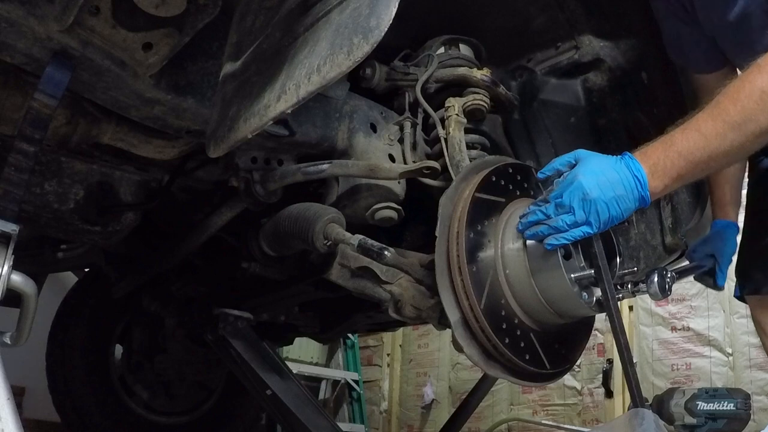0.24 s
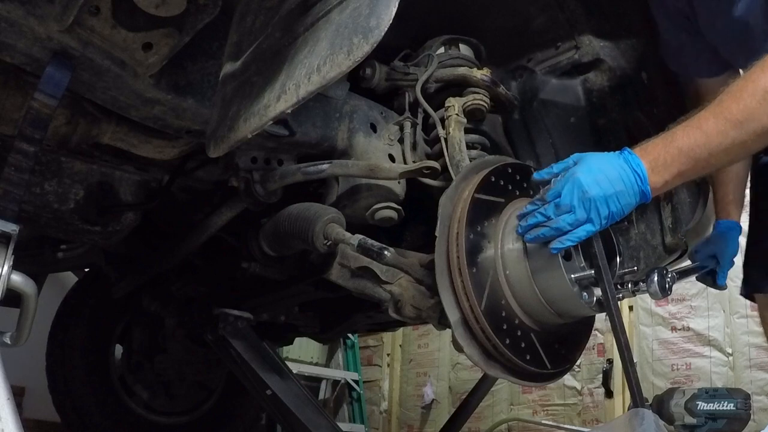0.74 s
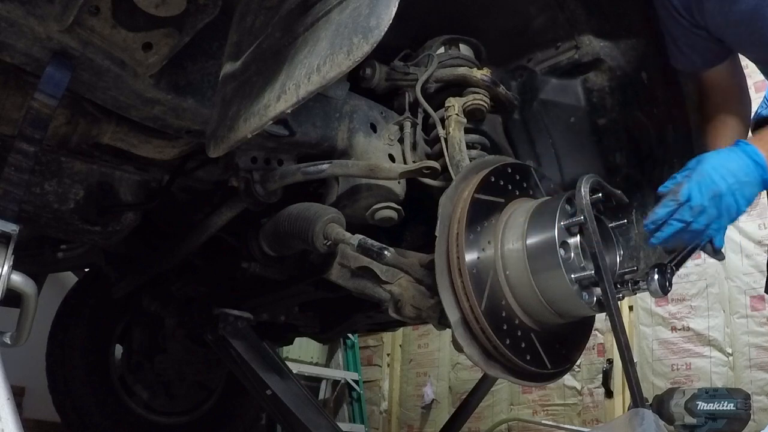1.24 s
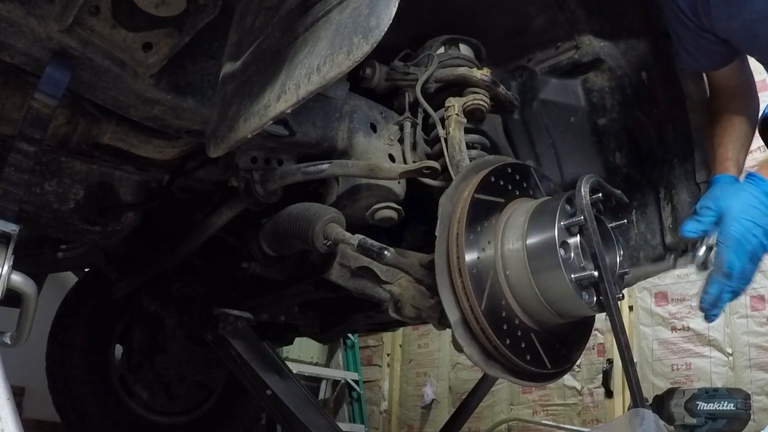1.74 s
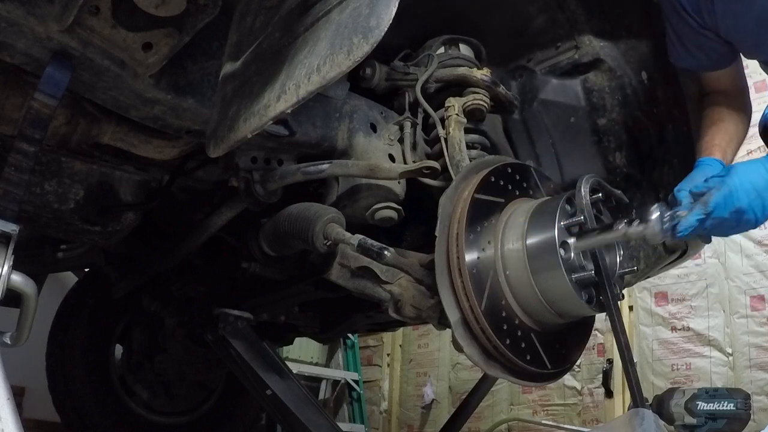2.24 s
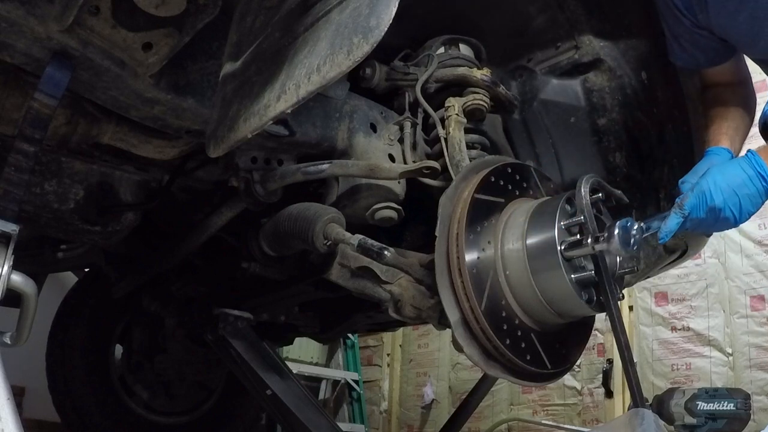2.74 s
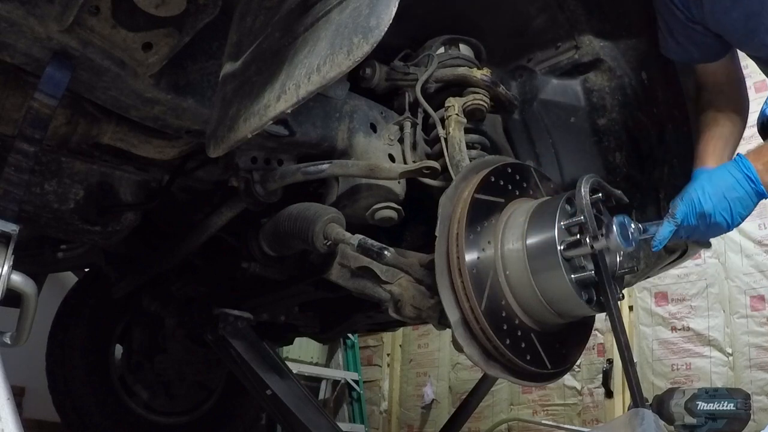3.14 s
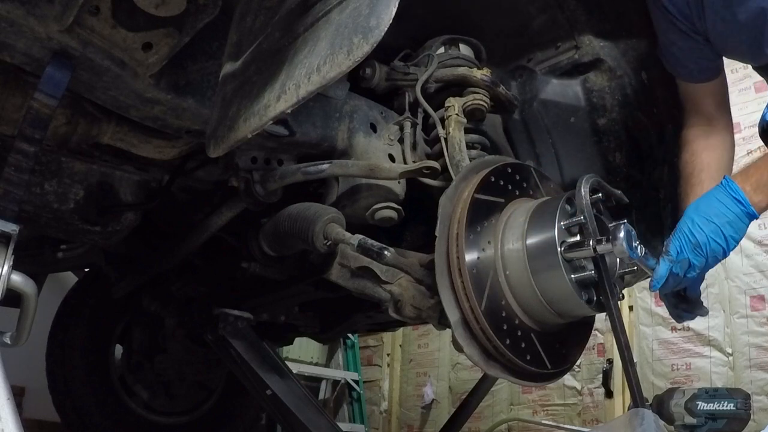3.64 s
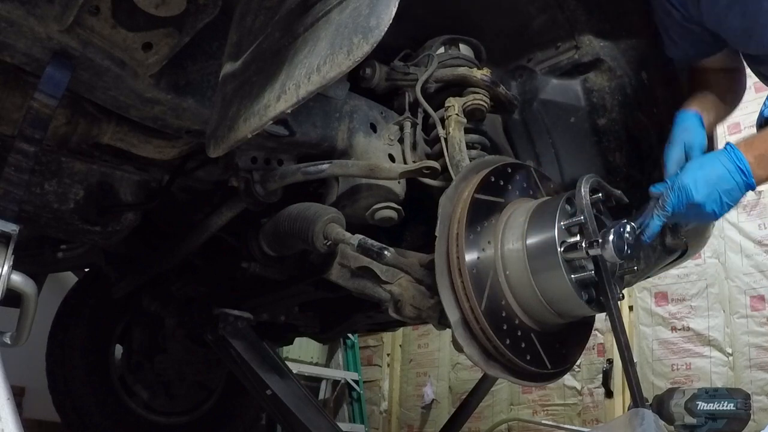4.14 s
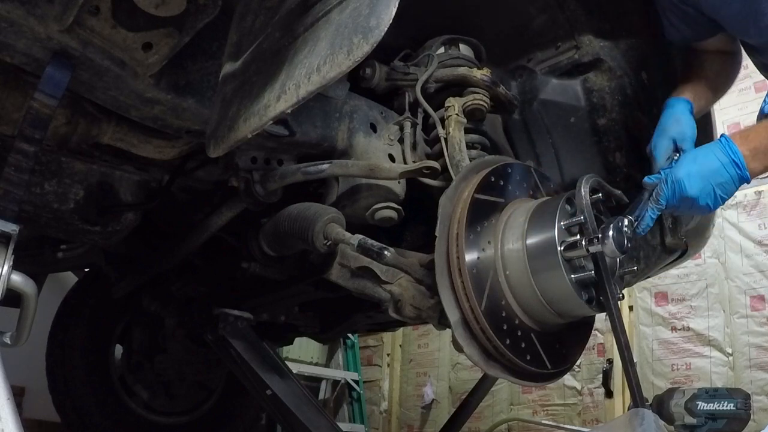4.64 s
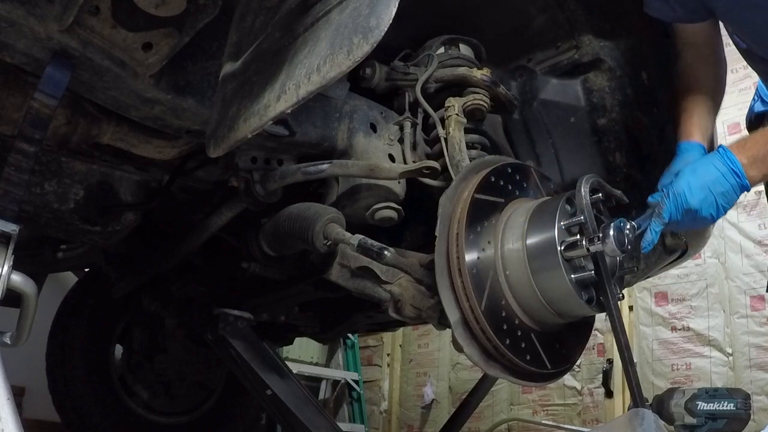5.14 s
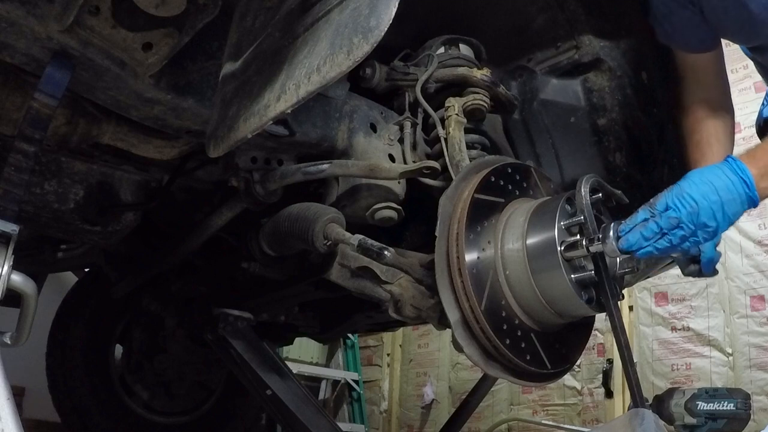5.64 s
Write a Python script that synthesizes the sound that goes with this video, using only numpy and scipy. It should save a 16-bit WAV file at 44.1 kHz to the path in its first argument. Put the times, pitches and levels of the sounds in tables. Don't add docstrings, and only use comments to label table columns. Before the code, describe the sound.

A torque wrench gives two loud metallic clacks on a wheel nut, then its socket clinks softly onto other nuts in a garage.

```python
import sys
import numpy as np
from scipy import signal
from scipy.fft import rfft, irfft
from scipy.io import wavfile
from scipy.ndimage import uniform_filter1d

SR = 44100
rng = np.random.default_rng(int(sys.argv[2]) if len(sys.argv) > 2 else 0)


def makeup_ratio(level_db):
    decades = np.asarray(level_db, float) / 20
    return 10 ** decades


def master(y):
    cut = np.clip(np.atleast_2d(y).T, -1, 1)
    pcm = np.round(cut * 32767)
    wavfile.write(sys.argv[1], SR, pcm.astype(np.int16))


N = 259749

# frequency_hz, density_db_per_hz
AIR_SPECTRUM = [(14, -38), (24, -16), (102, -7.5), (124, -14), (181, 1.5), (258, -7.5), (288, -4),
                (368, -11), (602, -15), (882, -18.5), (957, -17), (1040, -19), (5960, -30), (15300, -48.5),
                (16400, -50)]
# frequency_hz, width_hz, rms_db
DUCT_RESONANCES = [(58.4, 8.7, -70.5), (103, 8.76, -65), (190, 22, -62), (203.1, 39, -68.5), (239, 10, -64),
                   (287, 7.55, -62.5), (341.6, 24.8, -78), (437, 38, -65), (591.3, 49, -64.5),
                   (695.7, 19.87, -72.5), (974, 14, -66), (1160, 9.2, -69.5), (1318, 3.8, -73),
                   (1629, 47.9, -77), (2830, 6.5, -77)]
# frequency_hz, rms_db
MOTOR_TONES = [(25.6, -64.5), (59.2, -66)]
# peak_time_s, peak_db
GUSTS = [
    (0.11, -66),
    (0.39, -56),
    (0.66, -46),
    (.92, -48),
    (1.18, -46),
    (1.78, -47),
    (4.81, -58),
    (5.4, -61),
    (5.8, -47),
]

# start_s, ring_db, crack_db, chassis_thump_db, chatter_length_s
BREAKS = [
    (0.4, -6.5, -0.5, -20.5, 0.00833),
    (0.7664, 0, -3, -19.5, 0.0084),
]
# start_s, peak_db
CAM_BLOWS = [
    [(.4004, -2), (.4013, -5.5), (.4023, -3.5), (.4048, -0.5), (.4063, -1.5), (.4076, -4), (.4098, -5), (.4127, -12)],
    [(.7669, -1), (.7678, -5), (.7688, 1), (.7701, -3.5), (.7729, -8), (.7773, -6.5), (.7797, -9.5), (.7818, -8.5)],
]
# frequency_hz, level_db, t60_s
BREAK_MODES = [(1820, -18, 0.1202), (2298, -20.5, .15), (2766, -23.5, .15), (3673, -15, .18),
               (4027, -10, 0.071), (4280, -15, .17), (4520, -14, .13), (4650, -14.5, .09),
               (6000, -14.5, .05), (6283, -22, .1), (7585, -17, 0.087), (8775, -18.5, .1),
               (10600, -23, 0.18), (10990, -19, .09)]
RESET_MODES = [(1953, -15, 0.044), (2740, -16, .1), (3000, -24, .1), (3540, -13, .12), (3930, -19.5, .1),
               (4300, -17, .08), (4600, -17, .07), (5080, -19, 0.068), (5700, -24.5, .16),
               (6450, -13.5, 0.074), (8700, -5, 0.058), (10200, -13, .05)]
# frequency_hz, level_db, t60_s
BREAK_CLEAR_MODES = [(1843, -30, .22), (2062, -23.5, .24), (2143, -27, .44), (2540, -30, .15),
                     (2600, -23, .17), (2998, -30, .15), (3097, -27, .3), (4170, -51, .75),
                     (4370, -21, .19), (4520, -22, .14), (5230, -53, 1.1), (9862, -11.5, .18)]
RESET_CLEAR_MODES = [(1900, -17, .06), (2089, -39, .5), (2600, -27, .16), (2797, -29, .2), (3097, -28, .28),
                     (3274, -19, .16), (3407, -23, .12), (3488, -22, .15), (3596, -26, .27),
                     (3726, -22, .12), (3840, -23, .12), (5211, -29.5, .3), (6300, -20, .06),
                     (6620, -21, .1), (9819, -28, .24)]
# frequency_hz, density_db_per_hz
BREAK_CRACK = [(410, -43.5), (700, -25), (1700, -17.5), (2080, -2), (3300, -11), (4400, 0), (5000, -12.5),
               (6000, -2), (7000, -12), (7700, -5.5), (9300, -13.5), (10500, -4), (11500, -18.5),
               (14800, -16), (16000, -37.5)]
RESET_CRACK = [(410, -37), (700, -22.5), (852, -18.5), (1050, -24), (1890, -15.5), (2220, -13.5),
               (3370, -5.5), (4050, -7), (5120, -8), (7010, -12.5), (9990, -6.5), (11100, -18.5),
               (14200, -18), (15400, -24), (16000, -47.5)]
# frequency_hz, level_db, t60_s
BREAK_CHASSIS = [(38.7, -22.5, 0.41), (52, -20.5, 0.608), (199, -2, 0.11), (226, -0.5, .08),
                 (264, -11.5, .22), (317.7, -8.5, 0.19), (374, -7.5, .1), (410, -14, .13),
                 (457, -18.5, .15), (545.6, -19.5, .15), (630, -19, 0.17), (755, -23, .2),
                 (894, -17.5, 0.11)]
RESET_CHASSIS = [(38.24, -19, 0.84), (51.6, -23.5, 1), (176, -14.5, 0.15), (205, 4, 0.085), (252, -4, 0.12),
                 (255, -6, 0.23), (297, -15, 0.29), (372.5, 1, 0.17), (416, -14, 0.21), (483, -19, 0.27),
                 (563.5, -12.5, 0.13), (822, -17.5, 0.031)]

# frequency_hz, t60_s
ARCH_T60 = [(100, 0.51), (260, 0.28), (700, 0.39), (1840, 0.19), (4850, 0.15), (12800, 0.1109)]

# start_s, ring_db, crack_db, crack_length_s, brightness_db_per_octave
SEAT = [
    (1.249, -58.5, -50, 0.013, .1),
    (2.491, -60, -28, .0016, .1),
    (2.4925, -30, -32, .009, .1),
    (5.845, -57, -43, .01, .1),
]
LIFT_OFF = [
    (1.598, -56.5, -46.5, 0.0048, -15.5),
    (1.6262, -28, -25, .0078, 1.3),
]
REBOUND = [
    (2.613, -46, -46, .006, .1),
    (2.8955, -42.5, -41, 0.0087, .1),
]
TURN = [
    (2.8405, -33, -29.5, 0.0071, 0.55),
    (2.855, -50, -29, 0.0073, .1),
    (2.871, -56, -32.5, 0.0063, .1),
]
SHIFT = [
    (3.2025, -65, -51, .006, .1),
    (3.2522, -29, -29, 0.0061, 2.3),
    (3.269, -48, -36, 0.004, -5),
]
SETTLE = [
    (3.318, -41.5, -36, 0.0041, 1.5),
    (3.323, -48, -38.5, .004, -0.5),
    (3.334, -61, -41, .0079, -6),
]
RATTLE = [
    (4.183, -52, -52, 0.0053, -1),
    (4.1905, -51, -46, .004, -1),
    (4.198, -49, -54, .005, -3),
    (4.209, -48, -46, 0.004, 5),
    (4.217, -52, -52, .005, -4),
]
LATCH = [
    (4.227, -46.5, -39.5, .003, .1),
    (4.237, -56, -38, 0.0038, -1),
]
TICKS = [
    (2.9045, -47, -41, .0015, -2),
    (4.1905, -58, -46, .0012, 5),
    (4.2283, -49, -39, .0015, 1),
    (4.3763, -50, -50, .001, 3),
    (4.3843, -30, -40, .001, 3),
]
# frequency_hz, level_db, t60_s
SEAT_MODES = [(785, -25, .04), (946, -12, .051), (1100, -10, 0.051), (1233, -20, 0.11), (1495, -19, 0.11),
              (1690, -18, .25), (1848, 7.5, 0.051), (1927, 1, 0.04), (2260, -11, 0.11), (2471, -16, 0.19),
              (2540, -14, 0.19), (2820, -21, 0.19), (3451, -21, 0.13), (3600, -15, 0.1), (4640, -21, 0.11),
              (5070, -16, 0.04)]
LIFT_OFF_MODES = [(1147, -32, 0.33), (1800, -11.5, 0.16), (1856, -16, .1), (2063, -12, 0.15),
                  (2141, -15, .2), (2190, -15, 0.15), (2247, -14, .13), (2369, -24, .2), (2600, -26, 0.2),
                  (3505, -13, 0.13), (3619, -4.5, 0.14), (3713, -4.5, .18), (4430, -20, 0.15),
                  (4600, -17, .09), (6400, -24, 0.09), (10430, -14, .05), (10492, -27, 0.55),
                  (10575, -5, .055), (10492, -1, 0.065)]
REBOUND_MODES = [(1880, 2, 0.05), (2255, -8.5, .14), (2600, -13, 0.12), (3095, -12, 0.07),
                 (3400, -9, 0.042), (3714, -2, 0.11), (4460, -17, .08), (5857, -19, 0.08),
                 (10660, -16, 0.06)]
TURN_MODES = [(1850, -8, 0.16), (2040, -12, .06), (2234, -7, 0.11), (2606, -17, 0.2), (3106, -17, 0.2),
              (3714, -13, .11), (4000, 1, 0.05), (4280, -20, .13), (4590, -16, .1), (5100, -18, .12),
              (5857, -12, .1), (6230, -17, 0.064), (6648, -15, .1), (7300, -20, 0.14), (10610, -4, 0.11),
              (10950, -10, .02)]
SHIFT_MODES = [(1136, -20, 0.12), (1868, -10, 0.1), (2239, -21, 0.22), (3106, -23, .15), (3420, -16, .07),
               (3620, -0.5, 0.068), (3690, -6, 0.07), (4120, -21, .07), (4310, -23, .12),
               (4620, -17, 0.099), (5070, -20, 0.09), (7360, -28, 0.12), (8900, -19, 0.021),
               (11000, -17, 0.022), (11500, -21, 0.029), (12000, -25, .027)]
SETTLE_MODES = [(1434, -11, 0.25), (1650, -17, .15), (1845, 6.5, 0.062), (2250, -15, .1), (2610, -14, .11),
                (2950, -16, .08), (3650, -6, 0.11), (3700, -7, 0.17), (4270, -20, .06), (4670, -12, .054),
                (5200, -17, .1), (8120, -9, .02), (9000, -12, .015), (11200, -3.5, 0.016),
                (11400, -18, .035)]
RATTLE_MODES = [(1820, -1, 0.12), (3330, -6, .05), (3550, -3, .06), (3750, 0, .06), (3950, -3, .05),
                (4290, -6, .05), (5950, -14, .04), (8950, -16, .02), (10870, -9, 0.03), (11300, -12, .02)]
LATCH_MODES = [(1830, -3, .1), (2270, -2, 0.063), (2600, -10, .12), (3060, -10, .1), (3920, -4, .06),
               (4120, -6, .06), (5200, 0, .05), (6400, -12, .04), (11000, -10, .03)]
TICK_MODES = [(5400, -2, .011), (7000, -4, .01), (8600, 0, .012), (11900, -8, .01), (14000, -10, .01)]
# frequency_hz, density_db_per_hz
SEAT_CRACK = [(600, -16), (900, -5), (1400, -2.5), (1850, -2.5), (2600, -9.5), (5000, -19), (9000, -22.5),
              (14000, -36), (16000, -41.5)]
LIFT_OFF_CRACK = [(600, -12.5), (1500, -9.5), (2100, 4), (2800, -8.5), (3700, 1), (5500, -9.5), (8000, -20),
                  (10500, -4), (12500, -25), (16000, -35)]
TURN_CRACK = [(350, -41), (600, -15), (1550, -12), (2210, 1), (2760, -11), (3940, -8.5), (7730, -17),
              (10700, -19), (16000, -45)]
SHIFT_CRACK = [(600, -24), (1850, -10.5), (2700, -11), (3500, 3.5), (4600, -8.5), (6000, -20), (11500, -19),
               (16000, -42)]
SETTLE_CRACK = [(350, -31), (600, -10), (1130, -14), (1880, -7), (3340, -14), (3680, -8), (5560, -21),
                (11300, -34), (16000, -35)]
RATTLE_CRACK = [(600, -21), (1850, -6), (2900, -6), (3600, -13), (4500, -8), (6500, -14), (8500, -16),
                (16000, -31)]
RING_SWELLS = (0.0013, 0.0022, 0.0022, 0.0019, 0.00086, 0.0014, 0.0011, .001, 0.00045)

# start_s, length_s, level_db
SLIDES = [
    (1.579, .069, -53.5),
    (4.176, 0.07, -49.5),
]
# peak_time_s, peak_db
RUSTLES = [
    (1.93, -63.5),
    (4.57, -64.5),
    (4.64, -64),
    (5.68, -64),
]
# start_s, peak_db, length_s
SNAPS = [
    (4.3765, -41, 0.006),
    (4.381, -35, .004),
    (4.3843, -22, 0.0016),
    (4.3863, -29, 0.0022),
    (4.3897, -24.5, 0.004),
    (4.396, -33, .004),
]
# frequency_hz, density_db_per_hz
SNAP_SPECTRUM = [(350, -28), (600, -20), (1110, -19), (1370, -1.5), (1550, -19), (1800, 2), (2040, -7),
                 (2650, -10.5), (2950, 1), (3210, -9), (3860, -6.5), (5400, -8.5), (7520, -13),
                 (8500, -10.5), (10100, -5), (12000, -21), (15200, -16), (16000, -36.5)]


def rms_one(x):
    return x / np.sqrt(np.mean(x ** 2) + 1e-20)


def peak_one(x):
    return x / (np.max(np.abs(x)) + 1e-12)


def at_hz(points, hz):
    table = np.array(points)
    return np.interp(np.log(hz + 1), np.log(table[:, 0]), table[:, 1])


def coloured(x, spectrum):
    level_db = at_hz(spectrum, np.linspace(0, SR / 2, 1025))
    cepstrum = irfft(np.log(makeup_ratio(level_db)))
    cepstrum[1:1024] *= 2
    cepstrum[1025:] = 0
    response = irfft(np.exp(rfft(cepstrum)))
    return signal.fftconvolve(x, response)[:len(x)]


def resonance(x, hz, width_hz):
    r = np.exp(-np.pi * width_hz / SR)
    return signal.lfilter([1, 0, -1], [1, -2 * r * np.cos(2 * np.pi * hz / SR), r * r], x)


def ringing(modes, scatter_db, swell_s, tilt_db=0, flutter_db=0, size=SR // 2):
    hz, level_db, t60 = np.transpose(modes)[:, :, None]
    t = np.arange(size) / SR
    luck = rng.standard_normal((len(modes), 1))
    sense = (-1) ** np.arange(len(modes))[:, None]
    slow_noise = rng.standard_normal((len(modes), size // 300 + 1))
    flutter = signal.resample_poly(slow_noise, 300, 1, axis=1)[:, :size]
    level_db = level_db + scatter_db * luck + tilt_db * np.log2(hz / 3700) + flutter_db * flutter
    decay = makeup_ratio(level_db - 60 * t / np.maximum(t60, .01))
    sines = sense * decay * np.sin(2 * np.pi * hz * t)
    build_up = 1 - np.exp(-(t / max(swell_s, .0002)) ** 2)
    return sines.sum(axis=0) * build_up


def chatter(length_s, size=2048):
    t = np.arange(size) / SR
    shape = (1 - np.exp(-t / 0.00076)) * np.exp(-(t / max(length_s, .0005)) ** 2)
    hail = rng.standard_normal(size) * shape
    for _ in range(4):
        even = irfft(np.exp(1j * np.angle(rfft(hail))))
        hail = shape * even / np.sqrt(uniform_filter1d(even ** 2, size=70) + 1e-12)
    return hail


def crack_sound(length_s, spectrum):
    return peak_one(coloured(chatter(length_s), spectrum))


def add(track, sound, s):
    i = round(s * SR)
    track[i:i + len(sound)] += sound[:N - i]


def swells(events, rise_db_per_s, fall_db_per_s):
    s, peak_db = np.transpose(events)[:, :, None]
    late = np.arange(N) / SR - s
    return makeup_ratio(peak_db + np.minimum(rise_db_per_s * late, -fall_db_per_s * late)).sum(axis=0)


def fan():
    gain = makeup_ratio(at_hz(AIR_SPECTRUM, np.fft.rfftfreq(N, 1 / SR)))
    air = rms_one(irfft(rfft(rng.standard_normal(N)) * gain, N))
    white = rng.standard_normal(N)
    out = makeup_ratio(-53.5) * air
    for hz, width_hz, level_db in DUCT_RESONANCES:
        out += makeup_ratio(level_db) * rms_one(resonance(white, hz, width_hz))
    return out


def hum():
    t = np.arange(N) / SR
    return sum(makeup_ratio(level_db) * np.sqrt(2) * np.sin(2 * np.pi * hz * t) for hz, level_db in MOTOR_TONES)


def draught():
    band = signal.butter(3, [.9, 6.0], "band", fs=SR, output="sos")
    slow = signal.sosfilt(band, rng.standard_normal(N + SR))[SR:]
    gain = makeup_ratio(-58.5) + swells(GUSTS, rise_db_per_s=69.5, fall_db_per_s=37)
    return gain * rms_one(slow)


def wrench():
    rings, clear, cracks, body = np.zeros((4, N))
    wall_echo_s, wall_loss_db = .0453, 8
    parts = zip(BREAKS, (BREAK_MODES, RESET_MODES), (BREAK_CLEAR_MODES, RESET_CLEAR_MODES),
                (BREAK_CRACK, RESET_CRACK), (BREAK_CHASSIS, RESET_CHASSIS), CAM_BLOWS)
    for (s, ring_db, crack_db, thump_db, length_s), modes, clear_modes, crack, chassis, blows in parts:
        ring = ringing(modes, 0, swell_s=0.005, flutter_db=3.0, size=SR // 3)
        add(rings, makeup_ratio(ring_db - 5.5) * ring, s)
        add(clear, ringing(clear_modes, 0, swell_s=0.005, flutter_db=2, size=SR), s)
        add(cracks, makeup_ratio(crack_db) * crack_sound(length_s, crack), s)
        for blow_s, blow_db in blows:
            add(cracks, makeup_ratio(blow_db - 2.0) * crack_sound(.0006, crack), blow_s)
        boom = ringing(chassis, 0, swell_s=0.01287, flutter_db=4.5, size=SR)
        boom = makeup_ratio(thump_db) * peak_one(boom)
        for trip in range(4):
            add(body, makeup_ratio(-wall_loss_db * trip) * boom, s + wall_echo_s * trip)
    return rings, clear, cracks, body


def arch(x):
    garage_db, garage_longer = -11, 2.41
    t = np.arange(SR // 2) / SR
    tail = 0
    edges = 100 * 2 ** np.arange(0, 7.6, .5)
    for low, high in zip(edges, edges[1:]):
        band_pass = signal.butter(2, [low, high], "band", fs=SR, output="sos")
        band = signal.sosfilt(band_pass, rng.standard_normal(len(t)))
        t60 = np.clip(at_hz(ARCH_T60, np.sqrt(low * high)), .05, .6)
        fall_db = -60 * t / t60
        tail = tail + band * (makeup_ratio(fall_db) + makeup_ratio(garage_db + fall_db / garage_longer))
    tail = tail * (1 - np.exp(-t / .0015))
    return signal.fftconvolve(x, tail / np.sqrt(np.sum(tail ** 2)))[:N]


def socket():
    rings, cracks = np.zeros((2, N))
    groups = ((LIFT_OFF, LIFT_OFF_MODES, LIFT_OFF_CRACK),
              (SEAT, SEAT_MODES, SEAT_CRACK),
              (TURN, TURN_MODES, TURN_CRACK),
              (SHIFT, SHIFT_MODES, SHIFT_CRACK),
              (SETTLE, SETTLE_MODES, SETTLE_CRACK),
              (RATTLE, RATTLE_MODES, RATTLE_CRACK),
              (REBOUND, REBOUND_MODES, SHIFT_CRACK),
              (LATCH, LATCH_MODES, RATTLE_CRACK),
              (TICKS, TICK_MODES, SNAP_SPECTRUM))
    for (touches, modes, crack), swell_s in zip(groups, RING_SWELLS):
        for s, ring_db, crack_db, length_s, tilt_db in touches:
            ring = ringing(modes, 1.0, swell_s, tilt_db, flutter_db=2, size=SR // 3)
            add(rings, makeup_ratio(ring_db) * ring, s)
            add(cracks, makeup_ratio(crack_db) * crack_sound(length_s, crack), s)
    return rings, cracks


def slides():
    out = np.zeros(N)
    press_db, edge_s = -1, 0.011
    for (s, length_s, level_db), modes in zip(SLIDES, (LIFT_OFF_MODES, SHIFT_MODES)):
        late = np.arange(N) / SR - s
        contact = np.clip(np.minimum(late, length_s - late) / edge_s, 0, 1)
        press = contact * makeup_ratio(level_db + press_db * np.clip(late / length_s, 0, 1))
        grains = press * rng.standard_normal(N) * makeup_ratio(3.6 * rng.standard_normal(N) - 5.0)
        damped = ringing(np.array(modes) * [1, 1, .2], 0, swell_s=0.00027)
        out += signal.fftconvolve(grains, damped)[:N] / np.sqrt(np.sum(damped ** 2))
    return out


def gloves():
    rustle = resonance(rng.standard_normal(N), 5700, 5600)
    return swells(RUSTLES, rise_db_per_s=450, fall_db_per_s=400) * rms_one(rustle)


def ratchet():
    out = np.zeros(N)
    for s, peak_db, length_s in SNAPS:
        add(out, makeup_ratio(peak_db) * crack_sound(length_s, SNAP_SPECTRUM), s)
    return out


def scene():
    air = fan() + hum() + draught()
    rings, clear, cracks, body = wrench()
    socket_rings, socket_cracks = socket()
    rings = rings + socket_rings + slides()
    cracks = cracks + socket_cracks + ratchet()
    echoes = arch(makeup_ratio(-5) * cracks + makeup_ratio(-7.5) * rings + makeup_ratio(-6.5) * body)
    return (rings + clear + cracks + echoes + body + gloves() + air)[None]


def band_limit(x):
    return signal.sosfilt(signal.butter(12, 15450, fs=SR, output="sos"), x)


def record(dry):
    full_scale, cutoff_hz = .74, 16900
    held = np.clip(dry, -full_scale, full_scale)
    low_pass = signal.cheby2(12, 80, cutoff_hz, fs=SR, output="sos")
    cut = signal.sosfilt(low_pass, held)
    return band_limit(cut)


dry = scene()
out = record(dry)
master(out)
```